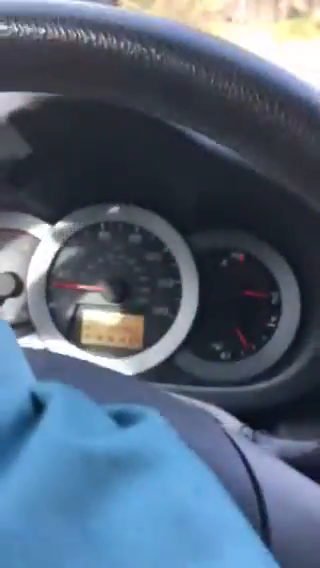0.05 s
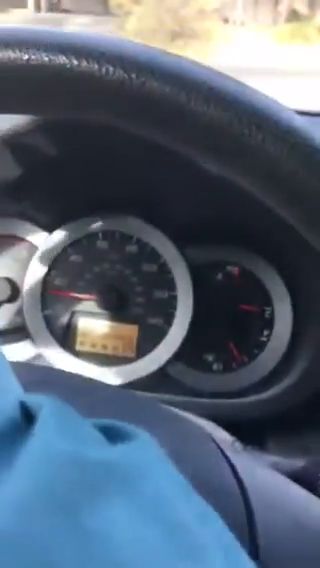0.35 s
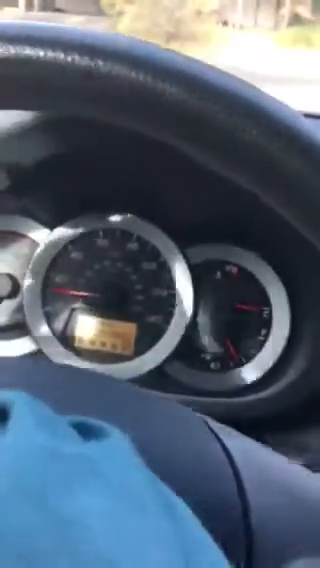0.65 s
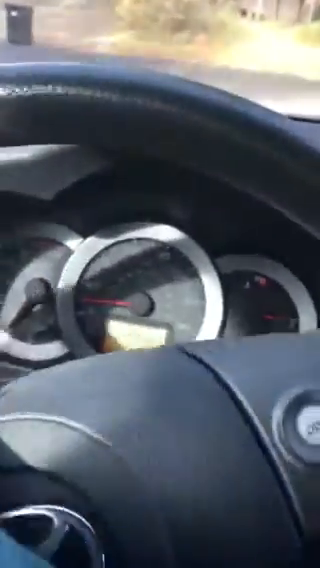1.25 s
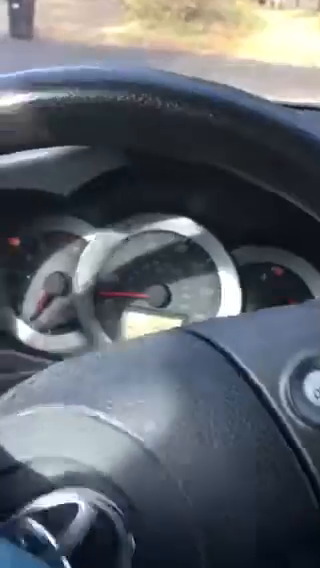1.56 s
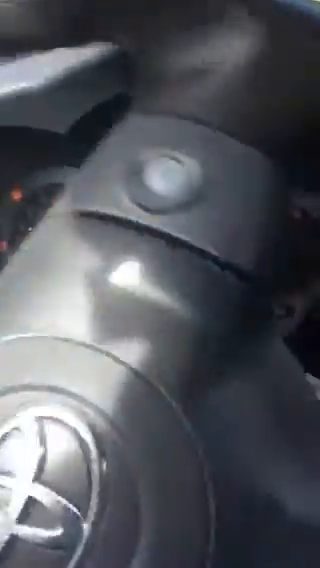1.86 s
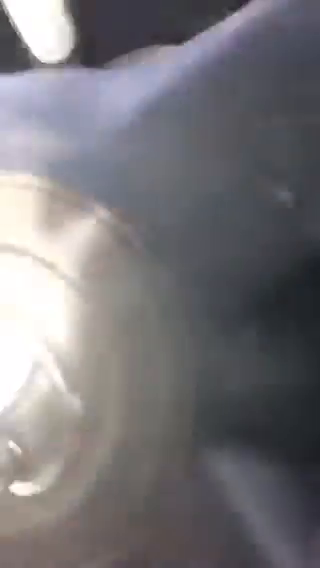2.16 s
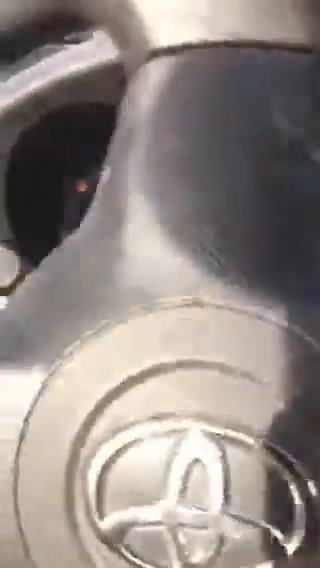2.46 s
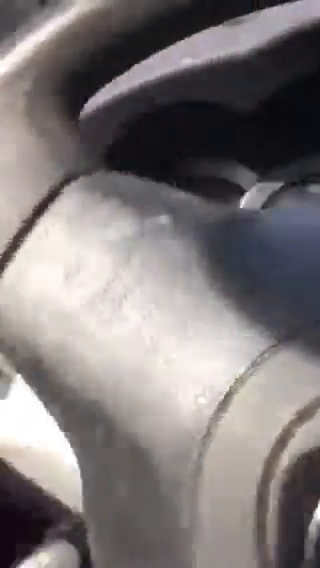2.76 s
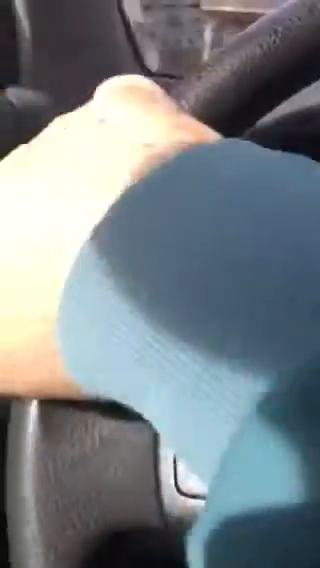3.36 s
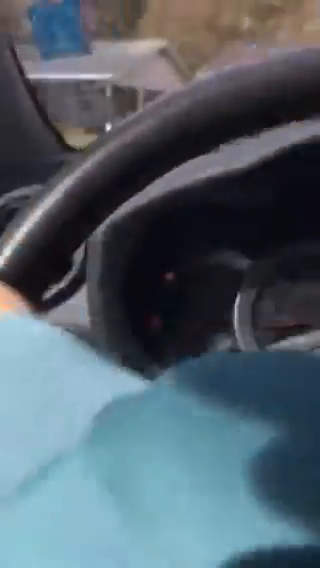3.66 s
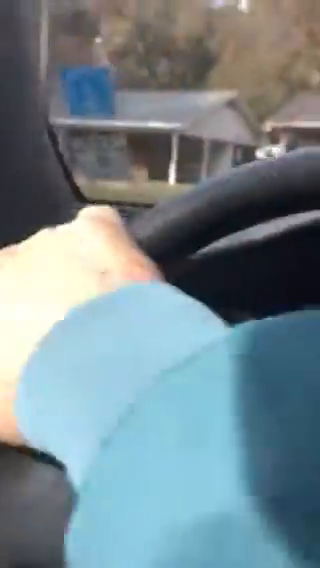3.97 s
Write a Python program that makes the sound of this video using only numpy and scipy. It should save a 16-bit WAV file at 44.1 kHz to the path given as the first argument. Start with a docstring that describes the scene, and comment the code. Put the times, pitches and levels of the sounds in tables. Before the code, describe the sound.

Low car rumble from inside, with a sliding steering wheel and two sharp indicator snaps.

```python
"""Inside a slowly moving car, microphone at the driver's seat, close to the steering wheel.
From the start engine and tyres rumble through the body, trim knocks and small loose parts tick.
The driver turns the wheel and the rim hisses through a hand; microphone handling clicks once at 1.4 s.
The indicator cam snaps in the column at 1.9 s and again at 2.8 s, with the hiss loudest in between.
Near the end come a hard knock and a rattle, and the rumble swells over rough ground."""
import sys
import numpy as np
from scipy import signal
from scipy.fft import rfft, irfft
from scipy.io import wavfile
from scipy.ndimage import uniform_filter1d

SR = 44100
rng = np.random.default_rng(int(sys.argv[2]) if len(sys.argv) > 2 else 0)


def put_to_file(sound):
    """Save the sound as 16-bit audio at rate SR, in the file named by the first command-line argument."""
    columns = np.atleast_2d(sound).T  # one column per channel
    safe = np.clip(columns, -1, 1)
    whole_steps = np.round(safe * 32767)
    wavfile.write(sys.argv[1], SR, whole_steps.astype(np.int16))


N = 176400
TIME = np.arange(N) / SR


def amp(db):
    """Decibels to gain."""
    return 10 ** (np.asarray(db) / 20)


def unit(x):
    """Scales to rms 1."""
    return x / np.sqrt(np.mean(x ** 2) + 1e-20)


def read(points, hz):
    """Reads a spectrum on a log-frequency axis."""
    point_hz, db = np.transpose(points)
    return np.interp(np.log(hz + 1), np.log(point_hz + 1), db)


def level(points):
    """Gain over time from points of seconds and dB."""
    return amp(np.interp(TIME, *np.transpose(points)))


def add(mix, start_s, sound):
    """Mixes a sound in at its start time."""
    part = mix[round(start_s * SR):][:len(sound)]
    part += sound[:len(part)]


def colour(x, spectrum, tilt_db=0, size=4096):
    """Causal filter with the given spectrum, tilted by so many dB an octave."""
    hz = abs(np.fft.fftfreq(size, 1 / SR))
    octaves = np.log2(np.maximum(hz, 200) / 1000)
    gain = unit(amp(read(spectrum, hz) + tilt_db * octaves))
    minimum_phase = np.exp(np.conj(signal.hilbert(np.log(gain + 1e-5))))
    taps = np.fft.ifft(minimum_phase).real
    return signal.fftconvolve(x, taps[:size // 2])


def noise(spectrum):
    """Steady noise of rms 1 with the given spectrum."""
    gain = amp(read(spectrum, np.fft.rfftfreq(N, 1 / SR)))
    return unit(irfft(rfft(rng.standard_normal(N)) * gain, N))


def wander(rate_hz):
    """Random drift of rms 1, mostly slower than rate_hz."""
    gain = np.exp(-(np.fft.rfftfreq(N, 1 / SR) / rate_hz) ** 2)
    return unit(irfft(rfft(rng.standard_normal(N)) * gain, N))


def steady(x, span_s):
    """Evens out swells slower than span_s."""
    power = abs(uniform_filter1d(x ** 2, max(int(span_s * SR), 2)))
    return x / np.sqrt(power + 1e-9)


def burst(rise_s, t60_s):
    """A contact in plastic: dense vibration that rises fast and dies away."""
    t = np.arange(SR // 6) / SR
    grain = steady(rng.standard_normal(len(t)), span_s=.001)
    attack = np.minimum(t / rise_s, 1)
    decay = amp(-60 * np.maximum(t - rise_s, 0) / t60_s)
    return grain * attack * decay


def light_contacts(events, spectrum):
    """Small parts touch with a thin, bright ring."""
    out = np.zeros(N)
    for start_s, db, rise_s, tilt_db in events:
        add(out, start_s, amp(db) * colour(burst(rise_s, t60_s=.045), spectrum, tilt_db))
    return out


def rim_slide():
    """The rim rubs along skin and sleeve: fine friction grains that swell and ebb with the turn."""
    # Hiss of the rubbing. Each row: frequency in Hz, level in dB.
    friction_spectrum = [(310, -19), (720, -1.5), (1450, -1), (2050, 2), (2650, -2), (3450, -1), (4500, -3),
                         (4950, -4.5), (6400, -4), (8100, -8), (9550, -7), (10450, -13), (12100, -10),
                         (13400, -15.5), (15700, -16), (17100, -51)]
    # The rim's passage through the hand. Each row: time in seconds, level in dB.
    slide_levels = [(0, -64), (.76, -71), (.81, -60), (.96, -63), (1.06, -55.5), (1.17, -62), (1.3, -57),
                    (1.44, -64), (1.54, -73), (1.67, -56.5), (1.8, -61.5), (1.87, -51.5), (2.0, -50.5),
                    (2.14, -42), (2.29, -50.5), (2.39, -50.5), (2.54, -58), (2.85, -56.5), (3.02, -52.5),
                    (3.3, -54.5), (3.45, -56.5), (3.56, -65), (3.75, -59.5), (4, -67)]
    grains = rng.standard_normal(N) * amp(2.0 * wander(rate_hz=2100))
    hiss = unit(colour(grains, friction_spectrum)[:N])
    flutter = amp(0.21 * wander(rate_hz=21))
    return hiss * level(slide_levels) * flutter


def indicator_snaps(rise_s=.0008):
    """The indicator cam rides over its pawl: a bright crack, then the ring of the column's casing."""
    # Resonances of cam and casing. Each row: frequency in Hz, level in dB.
    cam_spectrum = [(210, -33), (880, -19), (1180, -4.5), (1980, -3.5), (2850, -7), (3350, -3.5),
                    (3850, -4), (4150, 4), (4650, 4), (5050, -7), (6250, -1.5), (8050, -9.5), (9850, -2),
                    (10450, -11), (11100, -8), (13400, -16), (15750, -18), (17100, -51)]
    # Snaps of the cam. Each row: start in seconds, crack level in dB, ring level in dB.
    snaps = [(1.922, -21, -26.5), (2.779, -28, -21.3)]
    out = np.zeros(N)
    for start_s, crack_db, ring_db in snaps:
        crack = colour(burst(rise_s, t60_s=.014), cam_spectrum, tilt_db=.9)
        ring = colour(burst(rise_s, t60_s=.041), cam_spectrum)
        add(out, start_s, amp(crack_db) * crack + amp(ring_db) * ring)
    return out


def knocks_and_handling_click(split_hz=850):
    """Dull knocks in the trim, and one short, dry click of microphone handling at 1.4 s."""
    # Tone of knocks and click. Each row: frequency in Hz, level in dB.
    impact_spectrum = [(110, -9), (205, 3), (340, 5), (440, -2), (530, 3.5), (660, 2.5), (830, -1),
                       (1130, -6), (1380, 0), (1560, -9), (1820, -5), (2250, -9.5), (2880, -22),
                       (3380, -18), (4480, -17), (7100, -24), (10600, -33), (15700, -35), (17100, -71)]
    # Knocks and click. Each row: start in seconds, level in dB, T60 in seconds, tilt in dB per octave.
    impacts = [(.1146, -31, .042, -.6), (.5872, -33, .042, -.6), (1.3325, -42, .04, 1.5),
               (1.4084, -35.5, .005, 3), (1.6638, -34.5, .016, 1.7), (2.2292, -29.5, .013, 1.3),
               (3.171, -42, .04, 0), (3.4362, -21.7, .082, -.3)]
    low, high = (signal.butter(2, split_hz, kind, fs=SR) for kind in ("low", "high"))
    out = np.zeros(N)
    for start_s, db, t60_s, tilt_db in impacts:
        bass = signal.lfilter(*low, burst(rise_s=min(.005, t60_s / 10), t60_s=t60_s))
        treble = signal.lfilter(*high, burst(rise_s=.001, t60_s=.62 * t60_s))  # dies sooner
        add(out, start_s, amp(db) * colour(bass + treble, impact_spectrum, tilt_db))
    return out


def wheel_ticks():
    """Plastic parts in the steering wheel touch, about three times a second."""
    # Ring of the plastic. Each row: frequency in Hz, level in dB.
    plastic_spectrum = [(500, -22), (1250, -3), (1500, -7), (1800, 3), (2200, -7), (2500, -3), (2750, -9),
                        (3200, 0), (3900, -12), (4400, -8), (7500, -13), (9300, -10), (10400, -22),
                        (12350, -3), (13400, -18), (15600, -15), (17000, -50)]
    # Ticks. Each row: start in seconds, level in dB, rise in seconds, tilt in dB per octave.
    ticks = [(.3055, -46, .002, 1), (.645, -45.5, .005, -2), (.9925, -47, .002, .5), (1.334, -45, .003, -4),
             (1.652, -48, .003, 2), (1.663, -42, .001, -6), (1.996, -46, .003, -2), (2.339, -46, .002, 0),
             (2.681, -48, .003, -1), (3.024, -45, .002, 1), (3.3665, -47, .003, -1), (3.708, -49, .002, .5)]
    return light_contacts(ticks, plastic_spectrum)


def loose_rattles():
    """Loose parts, perhaps keys, jostle and clink."""
    # Ring of the loose parts. Each row: frequency in Hz, level in dB.
    rattle_spectrum = [(800, -18), (2000, -4), (2700, -8), (3350, 0), (3800, -4), (4450, 2), (5000, -3),
                       (6400, 2), (7500, -9), (8100, -3), (9200, -2), (10400, -13), (12000, -1),
                       (13400, -11), (15100, -6), (15800, -14), (17000, -55)]
    # Clinks. Each row: start in seconds, level in dB, rise in seconds, tilt in dB per octave.
    clinks = [(.1141, -53, .001, 3), (.1456, -51, .001, 0), (.177, -54, .003, 0), (.192, -56, .003, -2),
              (1.6177, -48, .002, -3), (2.9876, -46, .002, 0), (3.455, -47, .002, 1),
              (3.4832, -42, .001, 0), (3.4985, -34.5, .008, 3.5), (3.8545, -42.5, .001, -1),
              (3.8935, -48, .001, -1.5), (3.951, -54, .001, -3)]
    return light_contacts(clinks, rattle_spectrum)


def road_noise():
    """Engine and road shake the body: rumble, cabin boom, panel drone and tyre roar."""
    # Tone of each layer, deepest first. Each row: frequency in Hz, level in dB.
    rumble_spectrum = [(10, -44), (20, -21), (30, -11), (38, -2), (46, 1), (55, 1), (63, -7), (81, -29),
                       (160, -70), (1000, -140)]
    boom_spectrum = [(34, -44), (56, -11), (66, -1), (76, 3.5), (86, -4), (97, 1), (113, -8), (130, -3.5),
                     (149, -17), (260, -42), (520, -70), (3000, -140)]
    drone_spectrum = [(90, -36), (145, 3.5), (175, 4.5), (210, 1), (240, -8), (300, -2.5), (380, -13.5),
                      (520, -22.5), (1000, -70), (4000, -130)]
    tyre_spectrum = [(200, -20), (330, -1), (400, -1), (455, -5), (550, 2), (700, -5), (950, -11),
                     (1250, -13), (1800, -23), (3500, -35), (12000, -80)]
    # Swells of each layer as the car rolls on. Each row: time in seconds, level in dB.
    rumble_levels = [(0.0, -29.5), (0.18, -33), (0.21, -22.5), (0.28, -42), (0.87, -26), (1.26, -33),
                     (1.3, -26), (1.57, -38), (1.74, -30.5), (3.42, -39.5), (3.5, -21), (3.84, -24),
                     (3.9, -52), (3.94, -20), (4.0, -46)]
    boom_levels = [(0.0, -35.5), (0.09, -25), (0.21, -40), (0.36, -23.5), (0.41, -35.5), (0.71, -22),
                   (0.79, -38), (0.85, -24), (1.14, -30.5), (2.1, -32), (2.24, -38), (2.28, -23),
                   (2.34, -36.5), (3.02, -42), (3.1, -31.5), (3.31, -41), (3.84, -14), (4.0, -20.5)]
    drone_levels = [(0.0, -39.5), (1.18, -44.5), (1.25, -60), (1.28, -39), (1.37, -45), (1.64, -39.5),
                    (1.69, -55), (1.74, -47.5), (2.95, -41), (3.03, -34.5), (3.33, -40.5), (3.39, -37.5),
                    (3.94, -34), (4.0, -52)]
    tyre_levels = [(0, -57), (1.7, -58), (2.15, -55), (2.5, -57), (3.1, -52), (3.16, -43), (3.26, -51),
                   (3.58, -52), (3.74, -39), (3.88, -42), (4, -48)]
    rumble = steady(noise(rumble_spectrum), span_s=0.25) * level(rumble_levels)
    boom = steady(noise(boom_spectrum), span_s=0.099) * level(boom_levels)
    drone = steady(noise(drone_spectrum), span_s=0.18) * level(drone_levels)
    tyres = noise(tyre_spectrum) * level(tyre_levels) * amp(2.4 * wander(rate_hz=50))
    return rumble + boom + drone + tyres


def engine_hum(waver=0.01208, fade_s=0.24):
    """Faint, wavering tones of the running engine come and go."""
    # Engine tones. Each row: frequency in Hz, level in dB, start and end in seconds.
    tones = [(76.4, -43.5, -1, 2.4), (254.8, -54, 2.2, 3.65), (179.2, -49, 6, 2.9)]
    out = np.zeros(N)
    for hz, db, start_s, end_s in tones:
        cycles = np.cumsum(hz * (1 + waver * wander(rate_hz=3.52))) / SR
        inside_s = np.minimum(TIME - start_s, end_s - TIME)
        gate = np.clip(inside_s / fade_s + .5, 0, 1)  # stays shut for the tone starting at 6 s
        out += amp(db) * gate * np.sqrt(2) * np.sin(2 * np.pi * cycles)
    return out


def cabin_air(rush_db=-54, whine_db=-63):
    """Steady rush of air in the cabin, with a faint, fuzzy whine."""
    # The broad rush and the narrow whine. Each row: frequency in Hz, level in dB.
    rush_spectrum = [(300, -25), (450, -8), (530, -3), (620, -9), (720, -5), (900, -10), (1020, -7),
                     (1200, -10), (1400, -5), (1550, -11), (2070, -11.5), (2450, -18), (3500, -19),
                     (4500, -22), (4800, -27), (6400, -25.5), (7500, -30), (9500, -31), (10400, -38),
                     (12000, -35), (16000, -39), (17000, -65)]
    whine_spectrum = [(1150, -45), (1310, -10), (1395, 0), (1470, -10), (1650, -45), (3000, -90)]
    return amp(rush_db) * noise(rush_spectrum) + amp(whine_db) * noise(whine_spectrum)


def cabin_reflections(x, wet_db=-16):
    """Adds short, well damped reflections from the nearby glass and dashboard."""
    tail = burst(rise_s=0.012, t60_s=.07)
    return x + amp(wet_db) * signal.fftconvolve(x, tail / np.linalg.norm(tail))[:N]


def scene():
    """Everything heard from the driver's seat, in mono."""
    contacts = indicator_snaps() + knocks_and_handling_click() + wheel_ticks() + loose_rattles()
    background = road_noise() + engine_hum() + cabin_air()
    return (background + rim_slide() + cabin_reflections(contacts))[None]


def record(dry, low_cut_hz=25, top_hz=15950):
    """The microphone's low cut and the recorder's band limit."""
    low_cut = signal.butter(3, low_cut_hz, "high", fs=SR, output="sos")
    band_limit = signal.firwin(511, top_hz, window=("kaiser", 9), fs=SR)
    return signal.oaconvolve(signal.sosfilt(low_cut, dry), band_limit[None], "same")


dry = scene()
out = record(dry)
put_to_file(out)
```